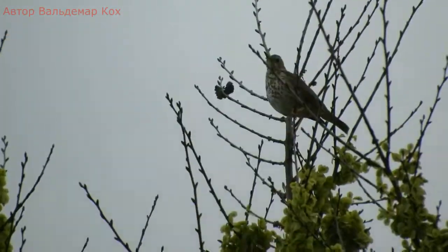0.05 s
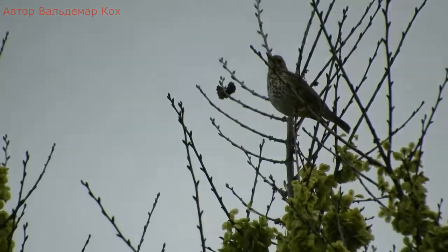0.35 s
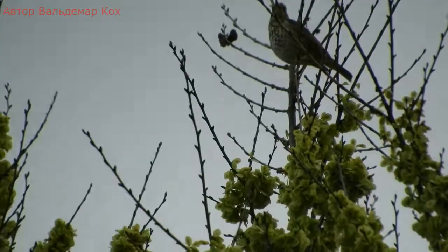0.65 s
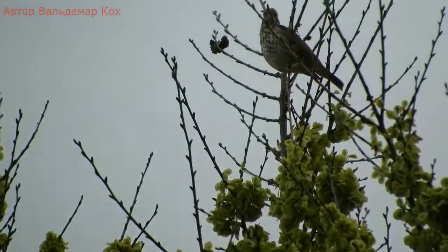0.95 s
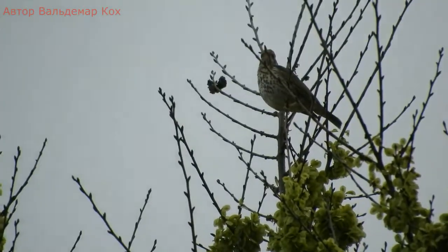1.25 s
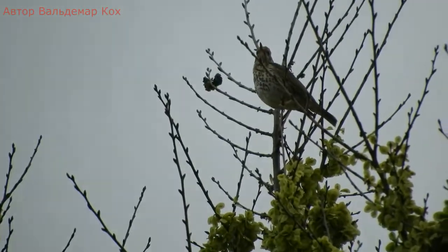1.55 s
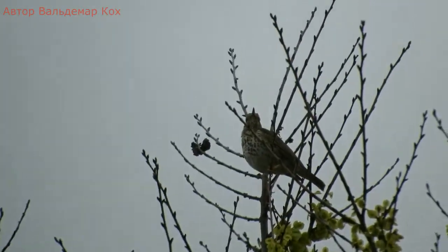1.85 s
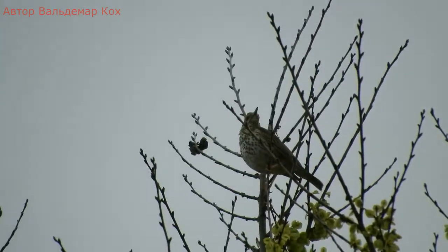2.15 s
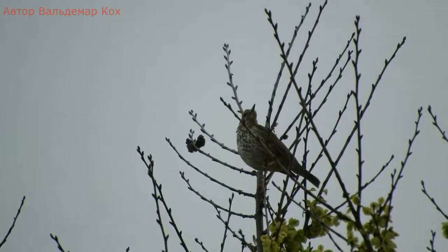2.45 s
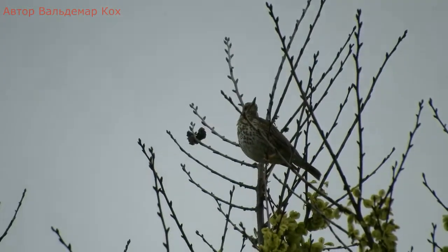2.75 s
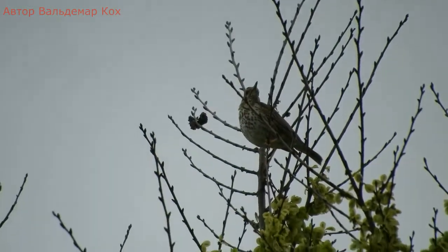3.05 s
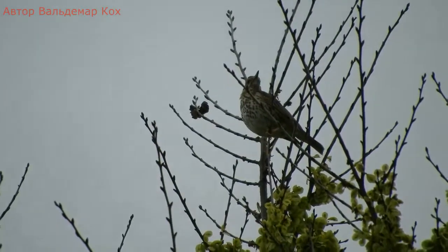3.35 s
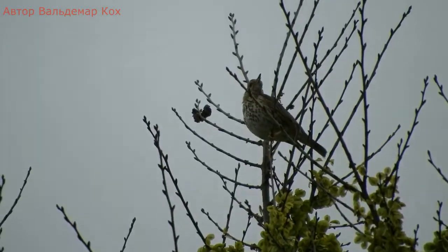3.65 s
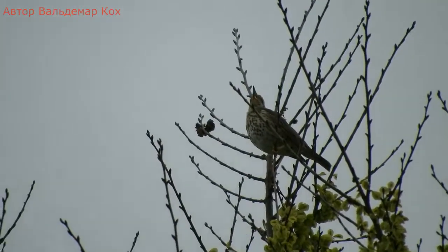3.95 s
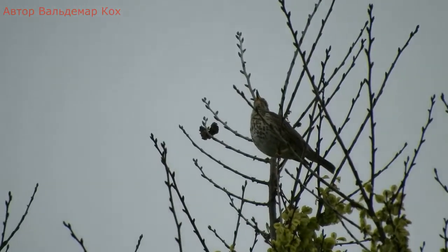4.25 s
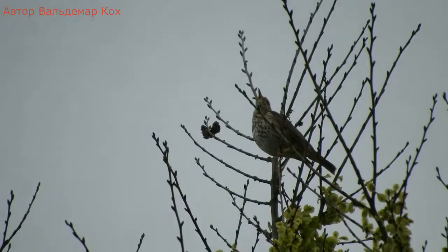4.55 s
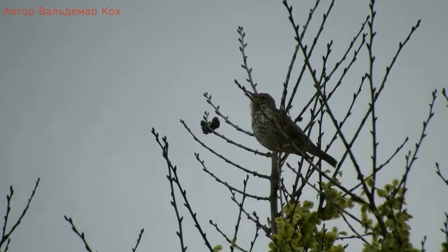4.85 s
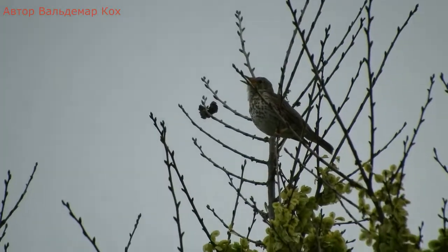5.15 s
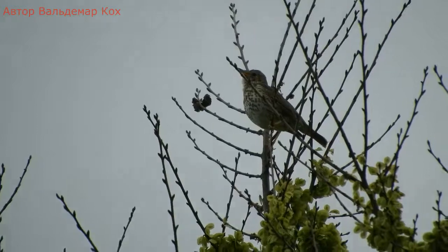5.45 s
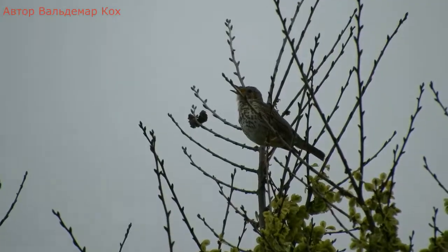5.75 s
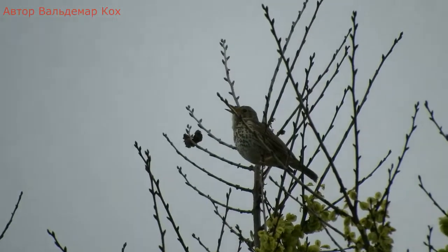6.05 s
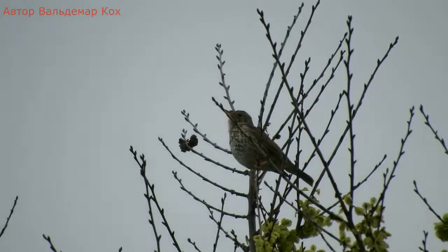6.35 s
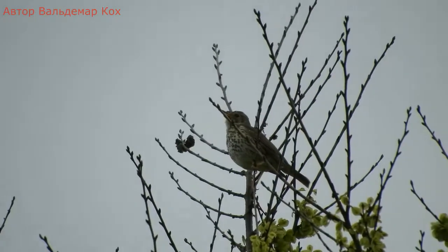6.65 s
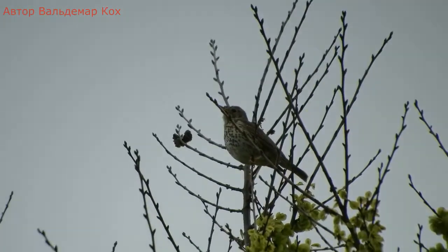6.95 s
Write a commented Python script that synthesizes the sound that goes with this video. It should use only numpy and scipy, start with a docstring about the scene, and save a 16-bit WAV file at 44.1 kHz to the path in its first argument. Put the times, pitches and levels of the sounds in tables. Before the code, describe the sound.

Straight in front of the microphone, a thrush sings from a treetop in short, harsh bursts with pauses between: first a reedy warble, then three chatters, a buzzing yelp, two screechy rattles, two squawks, two further yelps and one final squawk. Each call echoes briefly through the trees, over soft hiss and faint, distant birdsong. There is no bass, and the loudest notes distort slightly.

```python
"""Among trees, a thrush on a treetop straight ahead of the microphone, other birds singing far off.
Outdoor hiss fades in, and the thrush opens with a reedy warble and three chatters of three snaps each.
A yelp with a nasal buzz follows, then two rattles that end in a screech, two squawks, two more yelps
with buzzes and a last squawk. Each call comes from the syrinx and is scattered back by the trees.
The microphone overloads one-sidedly on the loudest notes, and the bass is cut away."""
import sys
import numpy as np
from scipy import signal
from scipy.fft import rfft, irfft
from scipy.io import wavfile
from scipy.ndimage import uniform_filter1d

SR = 44100
rng = np.random.default_rng(int(sys.argv[2]) if len(sys.argv) > 2 else 0)


def write(x):
    x = np.atleast_2d(x).T
    wavfile.write(sys.argv[1], SR, np.round(np.clip(x, -1, 1) * 32767).astype(np.int16))


N = 318402
BASS_CUT_HZ, TOP_CUT_HZ = 1247, 15900


def from_db(db):
    """Decibels to gain."""
    return 10 ** (np.asarray(db) / 20)


def rms_one(x):
    """Scale to unit rms."""
    return x / np.sqrt(np.mean(x ** 2) + 1e-20)


def gain_at(points, hz):
    """Gain of a spectrum (f/Hz, level/dB) at any frequency."""
    at, db = np.transpose(points)
    return from_db(np.interp(np.log(np.maximum(hz, 1)), np.log(at), db))


def coloured(x, points):
    """Give a noise the colour of a spectrum."""
    return irfft(rfft(x) * gain_at(points, np.fft.rfftfreq(len(x), 1 / SR)), len(x))


def flutter(rate_hz, spread):
    """Irregular beating of unit rms in a band around the given rate."""
    edges_hz = [rate_hz / (1 + spread), rate_hz * (1 + spread)]
    band = signal.butter(2, edges_hz, "band", fs=SR, output="sos")
    return rms_one(signal.sosfilt(band, rng.standard_normal(N)))


def gesture(start, end, first, middle, last, swell, pointed):
    """One push of air: its samples, an arched pitch (round or pointed) and a swell capped at 1."""
    at = np.arange(int(start * SR), min(int(end * SR), N))
    progress = np.clip((at / SR - start) / (end - start), 0, 1)
    arch = np.abs(np.sin(np.pi * progress))
    pitch = first + (last - first) * progress + (middle - (first + last) / 2) * arch ** pointed
    return at, pitch, np.minimum(1, swell * arch)


def hiss():
    """Quiet outdoor hiss in the centre and a much fainter white hiss, opposite in the two channels, both fading
    in."""
    # colour of the outdoor hiss: f/Hz, relative level/dB
    colour = [(900, -11), (1050, 0.5), (1250, -9), (1900, -6.5), (2700, -7.5), (3240, -4.5), (4070, -11.5),
              (4800, -12.5), (8000, -16.5), (12000, -20.5), (14500, -21.5), (15800, -20.5)]
    # opening fade: t/s, gain/dB
    fade_points = [(0, -60), (.2, -23), (.3, -10.5), (.4, -4), (.6, 2.5), (.75, 6), (1.0, 11), (1.2, 12)]
    fade = from_db(np.interp(np.arange(N) / SR, *np.transpose(fade_points)))
    outdoor_hiss = from_db(-66.5) * rms_one(coloured(rng.standard_normal(N), colour))
    white_hiss = from_db(-80) * rng.standard_normal(N)
    return fade * outdoor_hiss, fade * white_hiss


def trees(x):
    """Countless small echoes from nearby twigs and the more distant wood; unit energy."""
    # decay of the echoes: delay/s, relative level/dB
    decay = [(0, -29.5), (.004, 17), (.015, 3), (.03, -0.5), (.05, 1), (.1, -4), (.19, -9.5), (.3, -17.5),
             (.5, -24.5), (.8, -36), (1.2, -86)]
    # colour of the sound off the foliage: f/Hz, relative level/dB
    foliage = [(1000, 4), (2000, 1.5), (3500, 1.5), (4600, -0.5), (5500, -15.5), (8000, -23), (15000, -6.5)]
    envelope = from_db(np.interp(np.arange(SR) / SR, *np.transpose(decay)))
    echoes = coloured(rng.standard_normal(SR), foliage) * envelope
    return signal.fftconvolve(x, rms_one(echoes) / np.sqrt(SR))[:N]


def far_notes(wheeze_hz_per_s=4400, run_start_s=5.157, run_gap_s=.07):
    """What the birds far off sing: single whistles, rising wheezes and an even run of six notes."""
    # whistles: start/s, end/s, first f/Hz, middle f/Hz, last f/Hz, relative level/dB, roughness/0-1
    songs = [(0.199, 0.635, 4300, 4270, 4290, -75, 0.6), (1.377, 1.438, 4040, 3650, 3510, -45.5, 0.2),
             (1.44, 1.578, 3650, 3400, 3096, -41, 0.13), (3.435, 3.505, 4040, 3700, 2800, -48.5, 0),
             (3.511, 3.59, 2786, 4125, 4190, -44.5, 0.02), (4.106, 4.14, 5140, 4430, 4080, -45.5, 0.3),
             (4.313, 4.499, 4150, 4240, 3890, -50.5, 0.2), (4.993, 5.105, 4360, 4023, 3980, -43.5, 0.34),
             (5.32, 5.52, 4370, 4390, 4370, -52.5, 0.2), (5.72, 5.9, 3737, 3377, 3160, -45, 0.6),
             (6.28, 6.507, 3620, 4210, 4165, -42, 0.99), (6.73, 6.892, 4130, 4174, 4070, -49, 0.09)]
    # wheezes: start/s, end/s, middle f/Hz, relative level/dB
    wheezes = [(3.568, 3.727, 5330, -42.5), (4.065, 4.349, 5600, -44.5), (5.937, 6.134, 4840, -46.5),
               (6.917, 7.143, 4360, -54.5)]
    notes = list(songs)
    for start, end, hz, db in wheezes:
        rise = wheeze_hz_per_s * (end - start) / 2
        notes.append((start, end, hz - rise, hz, hz + rise, db, 1))
    for start in run_start_s + run_gap_s * np.arange(6):
        hz = 3740 + 117 * rng.standard_normal()
        notes.append((start, start + .054, 3026, hz, .94 * hz, -41.5, .3))
    return notes


def far_song(blur=2.3, waver_hz=30, flicker_db=3.4):
    """Distant notes reach the microphone along many paths, so pitch smears and strength flickers."""
    out, smear, flicker = np.zeros(N), flutter(159, spread=1.17), flutter(60, spread=.53)
    waver = waver_hz * flutter(24, spread=.596)
    for start, end, first, middle, last, db, rough in far_notes():
        at, pitch, swell = gesture(start, end, first, middle, last, swell=1.97, pointed=1)
        phase = 2 * np.pi * np.cumsum(pitch + waver[at]) / SR + blur * rough * smear[at]
        out[at] += from_db(db + flicker_db * flicker[at]) * swell * np.sin(phase)
    return out


def turbulence(voice, level_db):
    """Air forced through the syrinx hisses in step with the loudness of the voice."""
    # colour of the breath: f/Hz, relative level/dB
    colour = [(2000, -26), (4000, 5.5), (5500, -9), (7500, 2), (10000, 7), (12000, -30), (15000, -28)]
    loudness = np.sqrt(np.abs(uniform_filter1d(voice ** 2, size=64)))
    return from_db(level_db) * loudness * rms_one(coloured(rng.standard_normal(N), colour))


def buzzes(rows, jitter, shimmer, beak_db, beak_width_hz, leak_db):
    """The membrane snaps shut in a fast pulse train; throat and beak shape its harmonics."""
    # the throat's colour on a buzz: f/Hz, gain/dB
    throat = [(1300, -25), (1600, -16), (1900, 1.5), (2400, -4.5), (3400, 2), (4100, 0), (4700, 5.5),
              (5600, -22), (8000, -21), (14000, -42)]
    out, wobble, tremor = np.zeros(N), flutter(130, spread=.37), flutter(200, spread=1)
    k = np.arange(1, 23)[:, None]
    ringing = np.pi * k ** 2 / 5.5   # the throat rings on, smearing each pulse
    for start, end, first, middle, last, db, beak_hz, edge_hz in rows:
        at, pitch, swell = gesture(start, end, first, middle, last, swell=1, pointed=.88)
        phase = 2 * np.pi * np.cumsum(pitch * (1 + jitter * wobble[at])) / SR
        hz = k * pitch
        beak = from_db(beak_db / (1 + ((hz - beak_hz) / beak_width_hz) ** 2))
        edge = from_db(leak_db) + 1 / (1 + (hz / edge_hz) ** 20)
        partials = gain_at(throat, hz) * beak * edge * (hz < TOP_CUT_HZ) * np.cos(k * phase - ringing)
        out[at] += from_db(db - 7.5) * swell * (1 + shimmer * tremor[at]) * partials.sum(axis=0)
    return out


def whistles(sweeps, rasp_hz, spread, shake):
    """Near-sine sweeps; a slower, unsteady vibration of the syrinx adds harsh sidebands."""
    out, jitter, shimmer = np.zeros(N), flutter(rasp_hz, spread), flutter(rasp_hz, spread)
    for start, end, first, middle, last, db, rough, overtone_db in sweeps:
        at, pitch, swell = gesture(start, end, first, middle, last, swell=1.34, pointed=1.75)
        phase = 2 * np.pi * np.cumsum(pitch) / SR + rough * jitter[at]
        strength = from_db(db) * swell * (1 + shake * rough * shimmer[at])
        out[at] += strength * (np.sin(phase) + from_db(overtone_db) * np.sin(2 * phase))
    return out


def snap(s, hz, db, length_s=.0095, foot=.874, rough=.36):
    """A brief, hard burst from both sides of the syrinx: an arched sweep and a weaker, lower one."""
    start, end, low_hz = s - length_s / 2, s + length_s / 2, .8 * hz
    return [(start, end, foot * hz, hz, foot * hz, db, rough, -19),
            (start, end, foot * low_hz, low_hz, foot * low_hz, db - 12, rough, -30)]


def flick(s, low_hz, top_hz, low_db, high_db, foot_hz=2650, rise_s=.0095, fall_s=.0075, sag=.88):
    """Both sides of the syrinx flick up: the high voice rises and falls, the low sounds at the peak."""
    halfway, rough = sag * (foot_hz + top_hz) / 2, .13
    return [(s - rise_s, s, foot_hz, halfway, top_hz, high_db, rough, -30),
            (s, s + fall_s, top_hz, halfway, foot_hz, high_db - 4.5, rough, -30),
            (s - .004, s + .004, .836 * low_hz, low_hz, .795 * low_hz, low_db, rough, -35)]


def warble(start_s=.698, end_s=.838, rest_hz=1104, flip_s=.0034, sag_hz=190, sag_s=.013):
    """A reedy tone, shaped by the throat, flips up about an octave four times and sags in between."""
    # upward flips: t/s, top of the fundamental/Hz
    flips = [(0.7045, 1825), (0.736, 2284), (0.7695, 2305), (0.804, 2250)]
    # swell of the call: t/s, relative level/dB
    levels = [(0.672, -53), (0.68, -34), (0.702, -26.5), (0.808, -30), (0.84, -49)]
    # the throat's colour on the warble: f/Hz, gain/dB
    throat = [(1200, -36.5), (1800, -24), (2400, -1.5), (3500, 2.5), (4600, 0), (5200, -7.5), (6000, -22),
              (7000, -16.5), (8000, -24.5), (14000, -41)]
    at = np.arange(int(start_s * SR), int(end_s * SR))
    t, k = at / SR, np.arange(1, 12)[:, None]
    lift = sum((top - rest_hz) * np.exp(-((t - s) / flip_s) ** 2) for s, top in flips)
    sag = sum(sag_hz * (t > s + flip_s) * np.exp(-np.abs(t - s - flip_s) / sag_s) for s, _ in flips)
    pitch = (rest_hz + np.maximum(lift, sag)) * (1 + .03 * flutter(410, spread=.82)[at])
    phase = 2 * np.pi * np.cumsum(pitch) / SR
    partials = gain_at(throat, k * pitch) * (k * pitch < TOP_CUT_HZ) * np.cos(k * phase - k ** 2)
    partials[0] *= from_db(-16)   # weak fundamental
    db = np.interp(t, *np.transpose(levels)) - 2 + 9 * lift / rest_hz   # louder on each flip
    out = np.zeros(N)
    out[at] = from_db(db) * signal.windows.tukey(len(at), .07) * partials.sum(axis=0)
    return out


def chatters(rough=.65):
    """Sweeps of the chatters: three snaps over a weak rasp, which flares after the middle one."""
    # chatters: first snap/s, last snap/s, base f/Hz and level/dB of the later snaps,
    # f/Hz and level/dB of the first snap, f/Hz and level/dB of the rasp
    calls = [(1.585, 1.638, 3309, -10.5, 2680, -22.5, 3355, -21.5),
             (1.716, 1.7743, 2910, -14.5, 2570, -15.5, 2800, -26),
             (1.939, 1.9931, 3092, -14, 2500, -22.5, 3142, -24.5)]
    sweeps = []
    for first, last, hz, db, first_hz, first_db, rasp_hz, rasp_db in calls:
        middle = first + .43 * (last - first)
        sweeps += snap(first, first_hz, first_db)
        sweeps += snap(middle, 1.04 * hz, db + 1) + snap(last, 1.02 * hz, db)
        rasp = (first - .017, last + .0155, rasp_hz, rasp_hz, .92 * rasp_hz, rasp_db, rough, -35)
        flare = (middle, middle + .016, .9 * hz, .85 * hz, .89 * hz, db - 12, rough, -28)
        sweeps += [rasp, flare]
    return sweeps


def rattles(gap_ratio=.96, low_hz=2190, top_hz=4150, screech_hz=3400, snap_gap_s=.009):
    """Sweeps of the rattles: six flicks, ever quicker, higher and louder, then four snaps on a rasp."""
    # rattles: first flick/s, first gap/s, low voice/dB, screech t/s, screech level/dB,
    # change per snap/dB, rise per snap/Hz
    calls = [(3.670, .0157, -20, 3.7418, -13, 0, 10), (3.869, .0152, -21.5, 3.951, -11, -2, 153)]
    sweeps = []
    for s, gap, db, screech, screech_db, change_db, climb_hz in calls:
        for k in range(6):
            rise = 72 * k + 34 * rng.standard_normal()
            sweeps += flick(s, low_hz + rise, top_hz + 1.79 * rise, db + .5 * k, db - 7.5 + 2.5 * k)
            s += gap * gap_ratio ** k
        for k in range(4):
            hz = screech_hz + k * climb_hz + 114 * rng.standard_normal()
            sweeps += snap(screech + k * snap_gap_s, hz, screech_db + k * change_db)
        sweeps.append((screech, screech + .041, 2700, 3100, 3100, -21, .65, -22))   # the rasp
    return sweeps


def squawks(pulse_hz=608):
    """Sweeps and buzzes of the squawks: the buzz tightens into a rasp, flicks, and slackens again."""
    # squawks: flick t/s, high voice/dB, low voice/dB, low voice f/Hz, top of the flick/Hz,
    # relative level of the buzz before/dB, rasp after/dB
    calls = [(4.611, -16, -19, 2525, 4975, -23.5, -18), (4.790, -16.5, -16, 2664, 5130, -23.5, -14),
             (7.1958, -20.5, -14, 2434, 4570, -32, -21)]
    sweeps, pulses = [], []
    for s, high_db, low_db, low_hz, top_hz, buzz_db, after_db in calls:
        sweeps += flick(s, low_hz, top_hz, low_db, high_db,
                        foot_hz=2445, rise_s=.0085, fall_s=.00715, sag=.92)
        sweeps += [(s - .018, s - .005, 2900, 3080, 3250, buzz_db - 1, .6, -36),
                   (s + .001028, s + .0152, 3600, 3420, 2770, after_db, .45, -17)]
        pulses += [(s - .043, s, .88 * pulse_hz, pulse_hz, 1.04 * pulse_hz, buzz_db, 3650, 3850),
                   (s, s + .027, .83 * pulse_hz, 1.2 * pulse_hz, 1.01 * pulse_hz, -23, 3350, 3900)]
    return sweeps, pulses


def yelps(first_hz=1900, last_hz=2800, trill_hz=169.4, depth_hz=656, attack_s=.0081, release_s=.0082):
    """Loud arched whistles; a fast trill jerks the pitch up and chokes the tone on each upswing."""
    # yelps: start/s, end/s, top of the arch/Hz, level/dB, last upswing of the trill/s,
    # length of the trill/s, choking by the trill, octave overtone/dB
    calls = [(2.86, 2.9037, 3952, -8.5, 2.8845, .015, 2.2, -22),
             (5.558, 5.5696, 3460, -7.5, 5.563, 0, 0, -17),
             (6.139, 6.1858, 4180, -9, 6.161, .008, 0.61, -16)]
    out, jitter = np.zeros(N), flutter(600, spread=1)
    for start, end, top, db, trill_end, trill_s, choke, overtone_db in calls:
        at = np.arange(int(start * SR), int(end * SR))
        t, progress = at / SR, np.linspace(0, 1, len(at))
        foot = first_hz + (last_hz - first_hz) * progress
        trilling = (t > trill_end - trill_s) * (t < trill_end + .5 / trill_hz) * (trill_s > 1 / trill_hz)
        upswing = trilling * np.cos(np.pi * trill_hz * (t - trill_end)) ** 4
        pitch = foot + (top - foot) * np.abs(np.sin(np.pi * progress)) ** .5 + depth_hz * upswing
        phase = 2 * np.pi * np.cumsum(pitch) / SR + .06 * jitter[at]
        envelope = np.clip(np.minimum((t - start) / attack_s, (end - t) / release_s), 0, 1) ** 2
        strength = from_db(db) * envelope / envelope.max() / (1 + choke * upswing)
        out[at] += strength * (np.sin(phase) + from_db(overtone_db) * np.sin(2 * phase))
    return out


def thrush():
    """All five kinds of call as they leave the beak on the treetop, with the hiss of the breath."""
    # rasping slurs around the yelps: start/s, end/s, first f/Hz, middle f/Hz, last f/Hz, level/dB,
    # roughness/0-1, octave overtone/dB (the columns of every sweep)
    slurs = [(2.848, 2.8665, 2800, 3300, 3530, -32.5, 0.76, -44),
             (2.8585, 2.866, 2040, 2800, 3560, -22.5, 0.2, -30),
             (2.9, 2.935, 3510, 3500, 3710, -22.5, 0.65, -20),
             (5.536, 5.565, 3240, 3150, 3640, -22.5, 0.71, -43),
             (5.5632, 5.5835, 2665, 2905, 2130, -17.5, 0.21, -40),
             (5.573, 5.613, 3620, 3420, 3110, -22.5, 0.64, -45),
             (5.6043, 5.624, 2785, 3470, 4160, -15.5, 0.37, -24),
             (6.1365, 6.145, 1840, 2704, 3470, -27.5, .14, -15),
             (6.185, 6.225, 3926, 3500, 3360, -23, 0.58, -28)]
    # nasal buzz after each yelp: start/s, end/s, first, middle and last pulse rate/Hz,
    # relative level/dB, beak resonance/Hz, upper edge/Hz (the columns of every buzz)
    yelp_buzzes = [(2.916, 2.971, 585.4, 697, 567, -19, 2650, 4300),
                   (5.606, 5.667, 548, 651.6, 528, -20.5, 2530, 4490),
                   (6.202, 6.263, 531, 684, 528, -19.5, 2530, 4330)]
    # rising buzz that opens the warble, in the same columns
    warble_lead = [(0.672, .708, 1310, 1667, 1900, -32.5, 3460, 5570)]
    squawk_sweeps, squawk_pulses = squawks()
    voice = warble() + yelps()
    sweeps = chatters() + rattles() + squawk_sweeps + list(slurs)
    voice += whistles(sweeps, rasp_hz=537, spread=.38, shake=.49)
    pulses = list(warble_lead) + list(yelp_buzzes)
    voice += buzzes(pulses, jitter=.005, shimmer=.059, beak_db=10, beak_width_hz=250, leak_db=-26)
    voice += buzzes(squawk_pulses, jitter=.015, shimmer=.18, beak_db=7, beak_width_hz=370, leak_db=-22)
    return voice + turbulence(voice, level_db=-30)


def scene():
    """The thrush straight ahead, distant birds mostly as echo, and a nearly central hiss."""
    near, far = thrush(), far_song()
    birds = near + from_db(-18.5) * trees(near) + from_db(-25) * far + from_db(-2) * trees(far)
    birds = signal.sosfilt(signal.butter(8, 1500, "high", fs=SR, output="sos"), birds)
    outdoor_hiss, white_hiss = hiss()
    mid = birds + outdoor_hiss
    side = white_hiss + from_db(-42) * trees(near)
    return np.array([mid + side, mid - side])


def overload(x, bend):
    """The microphone rounds loud swings lopsidedly, adding bright overtones to the strongest notes."""
    soft = .65 * np.tanh(x / .65)
    bright = signal.butter(2, 2800, "high", fs=SR, output="sos")
    return soft - bend * signal.sosfiltfilt(bright, np.abs(soft) ** 3)


def record(dry):
    """Microphone overload, then steep cuts of the bass and the very top."""
    bass_cut = signal.butter(16, BASS_CUT_HZ, "high", fs=SR, output="sos")
    top_cut = signal.ellip(12, .1, 90, TOP_CUT_HZ, fs=SR, output="sos")
    return signal.sosfilt(top_cut, signal.sosfilt(bass_cut, overload(dry, bend=3.23)))


dry = scene()
out = record(dry)
write(out)
```